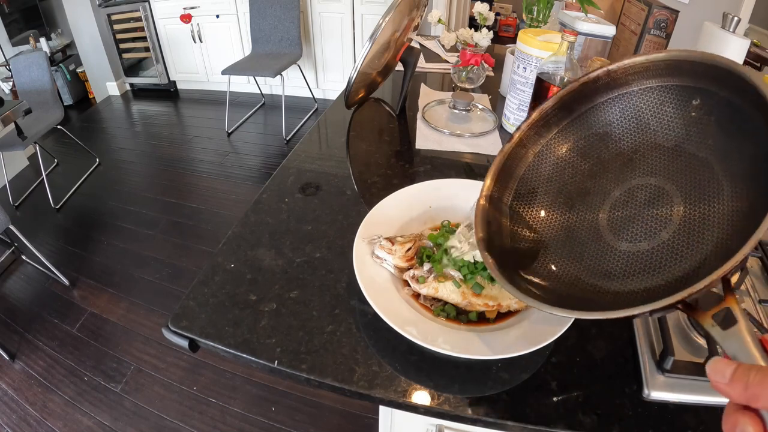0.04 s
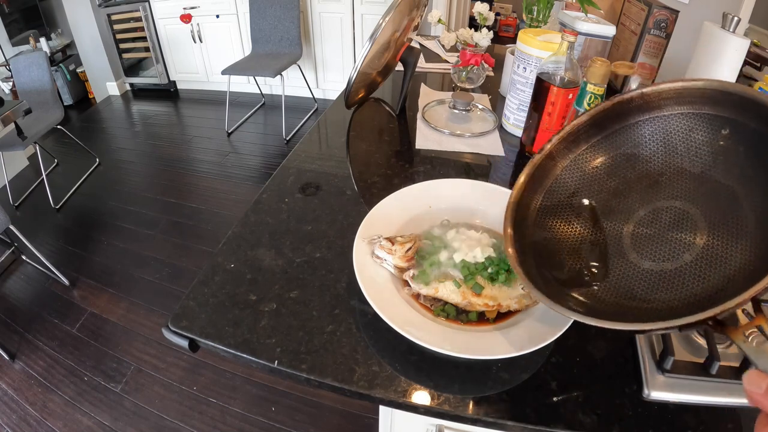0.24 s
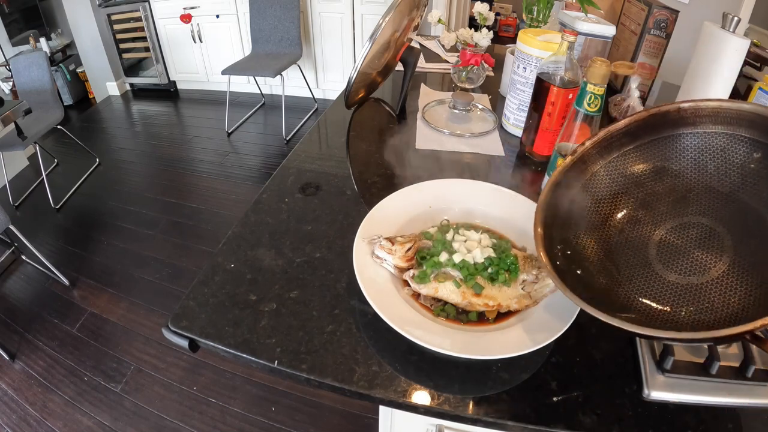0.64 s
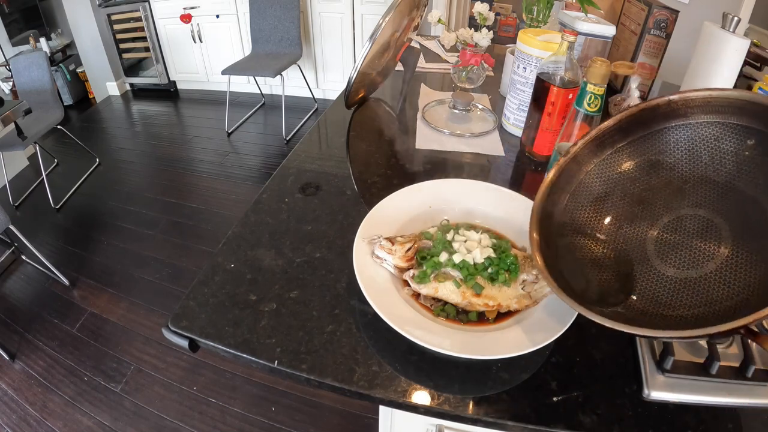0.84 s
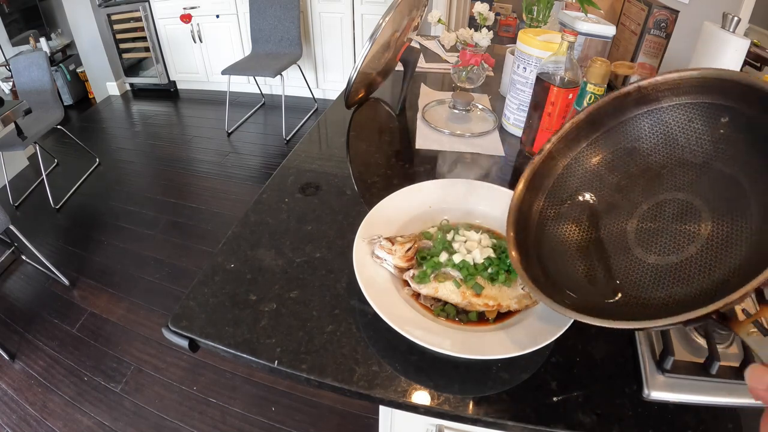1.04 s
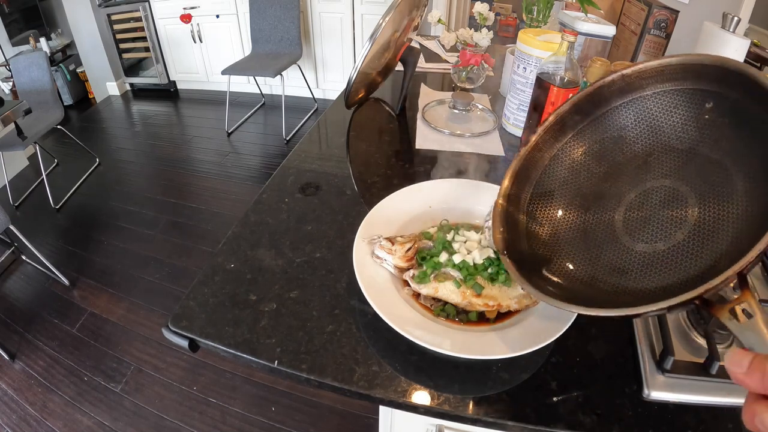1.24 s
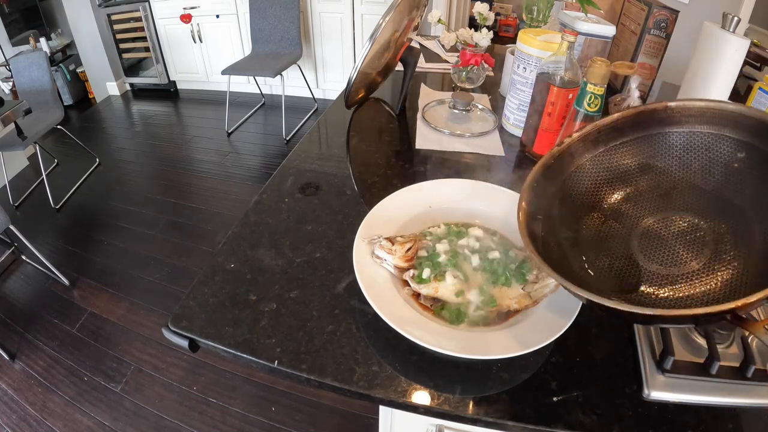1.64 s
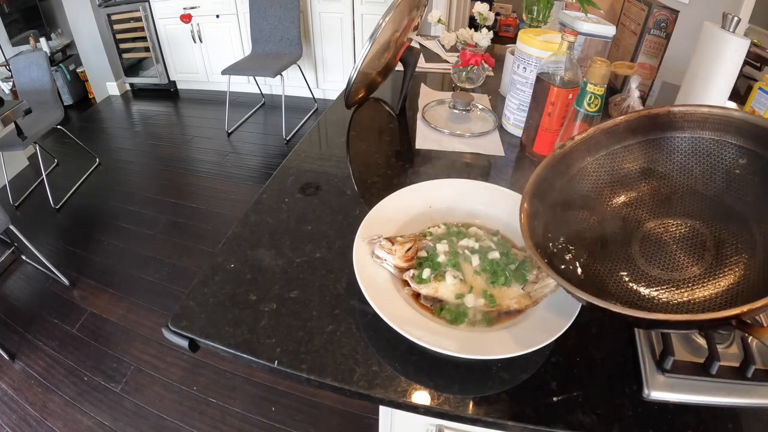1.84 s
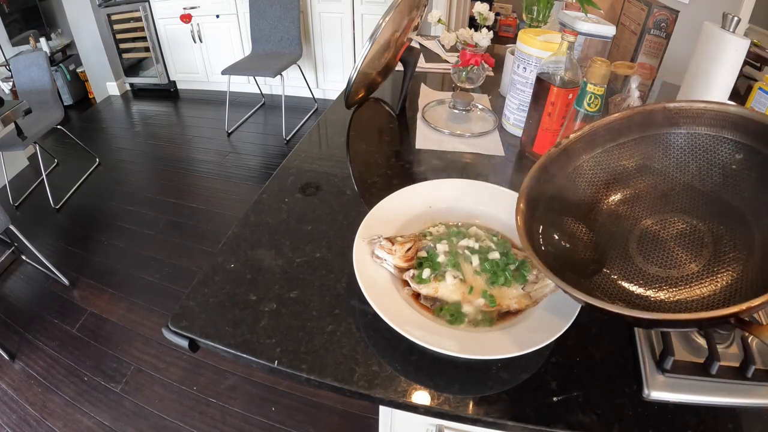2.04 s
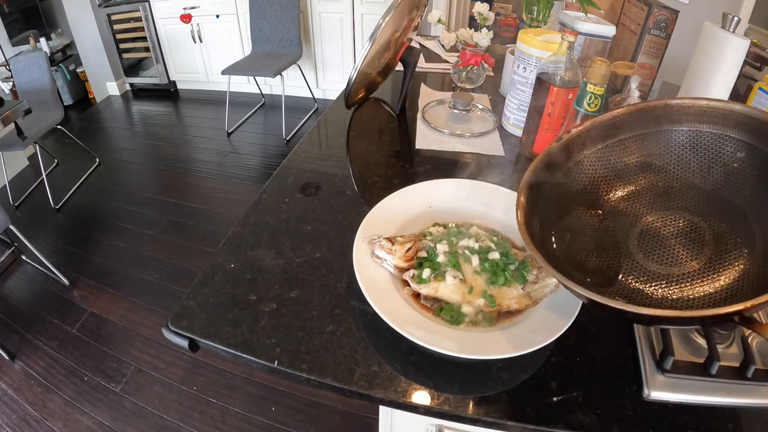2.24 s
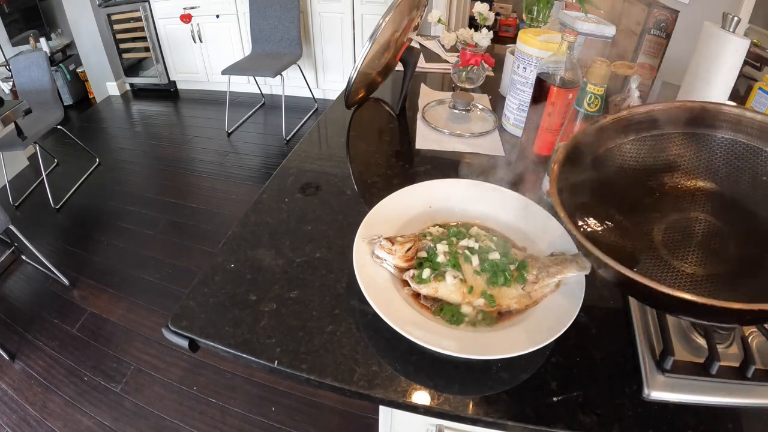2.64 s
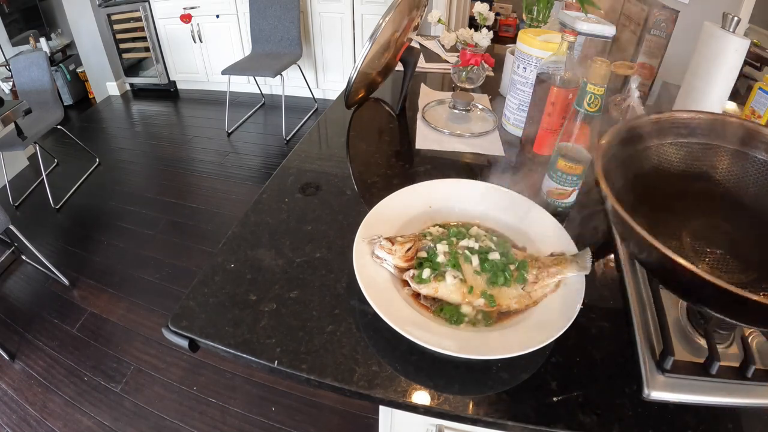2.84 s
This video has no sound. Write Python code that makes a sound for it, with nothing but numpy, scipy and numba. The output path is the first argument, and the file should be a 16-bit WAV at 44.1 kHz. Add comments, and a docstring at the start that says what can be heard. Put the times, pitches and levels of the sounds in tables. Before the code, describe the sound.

Hot oil sizzles loudly on fish and herbs just after the start, thinning to a fine fizz with sharp little pops. A steel pan clinks lightly around 0.8 seconds. At 1.4 seconds a second pour brings another dense sizzle, which fades more slowly and keeps crackling to the end. The pan clinks again from 2.5 to 2.7 seconds. The kitchen adds a short echo and a faint rumble.

```python
"""Hot oil sizzles as it is poured twice from a steel pan over a fish and herbs on a plate.
Each pour turns the moisture to steam in a dense boil of bursting bubbles, which thins to a
fine fizz and lone pops as the oil cools. The pan clinks lightly as it is tipped back after
each pour. The kitchen adds a short echo and a faint rumble."""
import sys
import numpy as np
from scipy import signal
from scipy.fft import rfft, irfft
from scipy.io import wavfile
from numba import njit

SR = 44100
rng = np.random.default_rng(int(sys.argv[2]) if len(sys.argv) > 2 else 0)


def digitize_waveform(pressure):
    """Quantize a signal to 16-bit integers and store it at the path in sys.argv[1].

    Rows of a 2-D input are taken as channels; values are limited to [-1, 1].
    """
    field = np.atleast_2d(pressure).T
    bounded = np.clip(field, -1, 1)
    quanta = np.round(bounded * 32767).astype(np.int16)
    wavfile.write(sys.argv[1], SR, quanta)


N = 132300

# Pours of oil: t/s, rise/s, hold/s, boil level/dB, boil fade/(dB/s), fizz level/dB,
# fizz fade/(dB/s), gurgle level/dB, sputter level/dB, first flash level/dB
POURS = [(0.137, 0.037, .115, -20, 45.5, -35, 19.5, -38.5, -39, -22.5),
         (1.397, 0.054, 0.15, -20, 24.5, -35.5, 6.5, -39, -34.5, -30.5)]
# Single spitting bubbles: t/s, level/dB, f/Hz, ring length/cycles
POPS = [(0.3793, -4.5, 3340, 3.1), (0.396, -20, 4400, 2), (0.444, -5, 2600, 1.6), (0.494, -2, 4830, 2.6),
        (0.5414, -13.5, 2150, 27), (0.543, -25, 890, 23), (0.5806, 0.5, 4020, 1.3),
        (0.6527, -12, 4020, 3.2), (0.6791, -9, 3680, 2.9), (.681, -40.5, 886, 33), (0.7497, -10, 4340, 3.6),
        (.9773, -8.5, 3700, 1.47), (.9989, -20, 5500, 3.5), (1.011, -48, 880, 28), (1.0408, -18, 2440, 2.9),
        (1.0795, -20, 2980, 2.2), (1.1126, -26, 5800, 8), (1.1158, -14.5, 5200, 7), (1.14, -5, 4160, 2.3),
        (1.2267, -24.5, 5600, 10), (1.3274, -20, 7200, 2.9), (1.768, -24.5, 232, 2.7),
        (1.837, 1, 4700, 2.2), (1.893, -20, 3500, 5), (1.9682, -10.5, 3340, 7.3),
        (2.0225, -11.5, 4650, 7.3), (2.0539, -10, 3200, 2), (2.072, 3, 4800, 1.6), (2.08, -4.5, 4200, 2.2),
        (2.0935, -1, 3980, 1.7), (2.121, -23.5, 937, 14), (2.129, -15, 3800, 5.8), (2.1505, -14.5, 2300, 6),
        (2.177, -7, 3820, 1.4), (2.1854, -8.5, 3850, 3.5), (2.2027, -9.5, 4900, 4.2),
        (2.2148, -3, 4830, 2.2), (2.2198, -14, 3770, 7), (2.2313, -1, 3650, 2.1), (2.2635, -8, 3500, 2.3),
        (2.3028, -20.5, 3630, 3.9), (2.319, -19, 2840, 5), (2.3478, -12, 3920, 13),
        (2.3509, -13, 2310, 3.3), (2.4335, -14, 4940, 4.5), (2.445, -41.5, 198, 5.1),
        (2.4508, -14, 4400, 3), (2.4606, -8.5, 4040, 3.4), (2.599, -3, 4000, 1.67),
        (2.6046, -9.5, 3700, 1.3), (2.6422, -15, 2250, 21), (2.718, -26, 1460, 8.2),
        (2.7825, -10.5, 4720, 3.3), (2.7861, -5.5, 4240, 1.32), (2.882, -17, 3170, 8.2),
        (2.8941, -12, 5340, 3.4), (2.9205, -17, 6200, 6)]
# Knocks on the pan: t/s, ring level/dB, brightest f/Hz, spread/octaves, ring time factor,
# scrape level/dB, scrape time to fade 60 dB/s
CLINKS = [(0.7059, -23.5, 4800, 0.18, 0.74, -21, .07), (0.7754, -23, 3050, 0.3, 0.98, -17.5, 0.036),
          (.778, -27, 5870, 0.13, 1, -18.5, 0.059), (0.8669, -32.5, 5970, 0.18, 0.86, -29.5, 0.059),
          (2.4986, -30, 4500, 0.2, 1, -21.5, .075), (2.518, -33, 4350, .13, 0.91, -28, 0.13),
          (2.6424, -27, 2740, 0.12, 0.74, -26, 0.12), (2.643, -23, 4840, 0.13, 1, -25.5, 0.12),
          (2.671, -31, 4350, 0.65, 0.88, -25.5, 0.12), (2.673, -42.5, 7900, 0.13, 0.68, -44, 0.063),
          (2.716, -50, 7000, .4, 0.97, -28, 0.19), (2.736, -41, 9500, 0.34, 0.78, -30, 0.077)]
# The pan's own ringing tones: f/Hz, level/dB, time to fade 60 dB/s
PAN_TONES = [(2648, -1, 0.39), (3047, -2, 0.24), (3640, -1.5, .28), (3790, -6, 0.42), (4250, -18, 0.33),
             (4368, -8.5, 0.25), (4464, -4, 0.43), (4700, -3, 0.18), (4360, -4.5, 0.4), (5370, -9, 0.38),
             (5340, -12, .2), (5730, -2, 0.09), (6130, -12.5, 0.45), (6880, -4, .17), (7140, -12, .2),
             (8080, 6, 0.13), (8970, 0, 0.25), (9550, 7, 0.2), (10700, -21, 0.19)]
# Tone curves of the rumble, the four bubble swarms and the pops: f/Hz, level/dB
RUMBLE_CURVE = [(20, -3.5), (55, -8), (100, -16), (128, -31), (155, -5.5), (190, -4), (245, -7.5),
                (450, -17.5), (1000, -21.5), (2500, -39), (15000, -50)]
BOIL_CURVE = [(100, -55), (300, -19), (520, -11.5), (620, -15), (760, -12), (860, -3), (960, -4),
              (1050, -2.5), (1200, -10), (1340, -6), (1520, -4), (1860, 2.5), (2300, -0.5), (2720, 1),
              (4500, -1.5), (7000, -6.5), (11000, -14), (15000, -7.5)]
FIZZ_CURVE = [(200, -47), (900, -8), (1300, -3), (2200, -5), (3300, -1), (4600, 0.5), (5500, -2),
              (7500, 0.5), (15000, -6)]
SPUTTER_CURVE = [(400, -42), (1500, -2), (2500, 3), (3600, 4.5), (4600, -10.5), (7000, -2), (15000, -17)]
GURGLE_CURVE = [(60, -33), (108, -20), (138, -1), (215, -0.5), (265, -7), (310, -2), (400, -5), (510, -4.5),
                (620, -3), (1200, -3.5), (4000, -58)]
POP_CURVE = [(60, -23), (105, -6), (160, 4), (3000, 4), (7000, 0), (15000, -4)]
# How well the pan passes each pitch to the air: f/Hz, level/dB
PAN_CURVE = [(150, -30), (700, -6), (2200, 0.5), (15000, -1.5)]
# How well the microphone picks up each pitch: f/Hz, level/dB
MICROPHONE_CURVE = [(100, -4), (6500, 0.5), (8100, 0), (9300, -12.5), (10800, 0.5), (12500, -4),
                    (14000, -14), (15800, -21)]


def gain(db):
    return 10 ** (np.asarray(db) / 20)


def unit(x):
    """Scale to an average (rms) level of 1."""
    return x / np.sqrt(np.mean(x ** 2))


def colour(x, curve, size=4096):
    """Filter a sound so that it follows a tone curve."""
    hz, db = np.array(curve, float).T
    grid_hz = np.arange(size // 2 + 1) * SR / size + 1
    cepstrum = irfft(np.log(gain(np.interp(np.log(grid_hz), np.log(np.sort(hz)), db))))
    # Fold the filter so that it never rings ahead of the sound.
    cepstrum[1:size // 2] *= 2
    cepstrum[size // 2 + 1:] = 0
    return signal.fftconvolve(x, irfft(np.exp(rfft(cepstrum)))[None], axes=1)[:, :N]


def room_rumble(level_db=-60.5, width=0.3):
    """The kitchen's faint, low background noise."""
    mid, side = rng.standard_normal((2, N))
    noise = np.array([mid + width * side, mid - width * side])
    return gain(level_db) * unit(colour(noise, RUMBLE_CURVE))


@njit
def bubble_rings(start, hz, cycles, size):
    """Each bubble rings as a short tone that fades by 60 dB over its number of cycles."""
    out = np.zeros(N)
    for k in range(len(start)):
        step = (2j * np.pi - np.log(1000) / cycles[k]) * hz[k] / SR  # turn and fade per sample
        first = int(start[k] * SR) + 1
        wave = size[k] * np.exp(step * (first - start[k] * SR)) / abs(step)
        turn, last = np.exp(step), 0.
        for i in range(max(first, 0), min(N, first + 3 + int(cycles[k] * SR / hz[k]))):
            out[i] += last - wave.imag  # the wave's slope starts with a snap
            last = wave.imag
            wave *= turn
    return out


def bursts(start, hz, cycles, size):
    """Bubbles burst all over the plate, so each reaches the two ears with its own lag and balance."""
    lag, balance = rng.standard_normal((len(start), 2)).T
    left_lag_s, left_db = 1.5e-5 + .4e-5 * lag, -0.1 * balance
    return np.array([bubble_rings(start + side * left_lag_s / 2, hz, cycles,
                                  size * gain(side * left_db / 2)) for side in (1, -1)])


def swarm(strength, curve, per_s, band_hz, cycles, scatter_db, thinning, spurt_db, count):
    """Many bubbles burst in spurts; as the strength drops they get quieter and further apart."""
    when, pitch, length, luck, big = rng.random((count, 5)).T
    spurts = np.interp(np.arange(N) / SR * 35, np.arange(400), rng.standard_normal(400))  # 35 a second
    now = (strength * gain(spurt_db * spurts))[(when * N).astype(int)]
    chance = np.minimum(per_s * N / SR / count * (now / strength.max()) ** thinning, 1)
    low, high = band_hz
    hz = low * (high / low) ** pitch
    ring_cycles = 1 - cycles * np.log(1 - length)
    boost = gain(scatter_db * np.minimum(-np.log(1 - big), 3.6))  # a few bubbles stand out
    size = now / np.sqrt(chance) * hz / np.sqrt(ring_cycles) * boost
    on = luck < chance
    bubbles = bursts(when[on] * N / SR, hz[on], ring_cycles[on], size[on])
    return unit(colour(bubbles, curve)) * np.sqrt(np.mean(strength ** 2))


def swell(start, rise, hold, db, fade):
    """Strength of one pour: it rises, holds, then fades as the oil cools."""
    age = np.arange(N) / SR - start
    return np.clip(age / rise, 0, 1) ** 2 * gain(db - fade * np.maximum(age - rise - hold, 0)) + 1e-9


def sizzle(flash_fade_db_per_s=71, gurgle_late_s=0.046, sputter_rise_s=0.22):
    """Water flashes to steam under the oil: a boil over a low gurgle, then sputter and lasting fizz."""
    boil = fizz = gurgle = sputter = 0
    for (start, rise, hold, boil_db, boil_fade, fizz_db, fizz_fade,
         gurgle_db, sputter_db, flash_db) in POURS:
        boil += swell(start, rise, hold, boil_db, boil_fade)
        fizz += swell(start, rise, hold, fizz_db, fizz_fade)
        fizz += swell(start, rise, 0, flash_db, flash_fade_db_per_s)
        # Large bubbles build later and die sooner; sputter takes over as the boil thins.
        gurgle += swell(start, rise + gurgle_late_s, hold, gurgle_db, boil_fade * 1.45)
        sputter += swell(start, sputter_rise_s, hold, sputter_db, boil_fade * 0.83)
    return (swarm(boil, BOIL_CURVE, per_s=11000, band_hz=(481, 13720), cycles=9,
                  scatter_db=3, thinning=.75, spurt_db=1.54, count=45000)
            + swarm(fizz, FIZZ_CURVE, per_s=10000, band_hz=(1093, 14900), cycles=17.5,
                    scatter_db=1, thinning=.25, spurt_db=2.5, count=30000)
            + swarm(sputter, SPUTTER_CURVE, per_s=810, band_hz=(1830, 5530), cycles=9.4,
                    scatter_db=5.5, thinning=.6, spurt_db=2, count=3000)
            + swarm(gurgle, GURGLE_CURVE, per_s=600, band_hz=(117, 860), cycles=7.5,
                    scatter_db=1, thinning=.84, spurt_db=1, count=4000))


def pops(collapse_db=-12):
    """Single larger bubbles snap and ring; a weaker snap follows as each one's skin collapses."""
    start, db, hz, cycles = np.array(POPS).T
    late, pitch = rng.random((len(POPS), 2)).T
    snap = bursts(start, hz, cycles, gain(db))
    delay_s = 0.000844 * (0.342 + late)
    collapse = bursts(start + delay_s, hz * (.7 + .6 * pitch), cycles + 3, gain(db + collapse_db))
    return colour(snap + collapse, POP_CURVE)


def pan_clinks(max_detune=0.012, twin_size=0.66, attack_s=0.00056):
    """Each knock scrapes and rings the steel; where it lands decides which tones sound and how long."""
    out = np.zeros((2, N))
    age = np.arange(SR // 2) / SR
    hz, db, fade_s = np.array(PAN_TONES).T[:, :, None]
    for start, ring_db, bright_hz, spread, sustain, scrape_db, scrape_s in CLINKS:
        def weight(f):
            """Pitches near the knock's brightest one sound most."""
            return np.exp(-.5 * (np.log2(f / bright_hz) / spread) ** 2) + .035 * np.minimum(f / 3000, 1)

        phase, twin_phase, split = rng.random((3, len(PAN_TONES), 1))
        twin_hz = hz * (1 + max_detune * (2 * split - 1))  # each tone has a slightly mistuned twin
        pair = np.sin(2 * np.pi * (hz * age + phase))
        pair += twin_size * np.sin(2 * np.pi * (twin_hz * age + twin_phase))
        levels = gain(ring_db + db - 60 * age / (fade_s * sustain)) * weight(hz)
        ring = np.minimum(age / attack_s, 1) * np.sum(levels * pair, axis=0)
        noise_spectrum = rfft(rng.standard_normal(len(age)))
        grit = unit(irfft(noise_spectrum * weight(np.linspace(1, SR / 2, len(noise_spectrum)))))
        scrape = grit * gain(scrape_db - 60 * age / scrape_s)
        first = int(start * SR)
        out[:, first:first + len(age)] += (ring + scrape)[:N - first]
    return colour(out, PAN_CURVE)


def below(x, hz):
    """Soften everything above this pitch."""
    return signal.sosfilt(signal.butter(1, hz, fs=SR, output="sos"), x)


def kitchen(x, echo_db, right_db, low_fade_s=0.52, treble_fade_s=0.18):
    """Add echoes from counter and walls, whose treble dies first, and lean the sound to the right."""
    age = np.arange(SR // 2) / SR
    mid, side = rng.standard_normal((2, len(age)))
    side -= below(side, 850)  # the bass is alike in both ears
    noise = np.array([mid + side, mid - side])
    low = below(noise, 2700)
    tail = low * gain(-60 * age / low_fade_s) + (noise - low) * gain(-60 * age / treble_fade_s)
    tail *= (1 + 3.9 * np.exp(-age / 0.0032)) * (age > .0005)  # the first echoes are strongest
    tail /= np.sqrt(np.sum(tail ** 2, axis=1, keepdims=True))
    echo = gain(echo_db) * signal.fftconvolve(x, tail, axes=1)[:, :N]
    return (x + echo) * gain([[-right_db / 2], [right_db / 2]])


def scene():
    """The sizzling food and the clinking pan, over the room's rumble."""
    food = kitchen(sizzle() + pops(), echo_db=-6.5, right_db=1)
    steel = kitchen(pan_clinks(), echo_db=-7.5, right_db=3)
    return food + steel + room_rumble()


def record(dry):
    """The microphone has a narrow dip in the treble, and the very top is cut off."""
    top_cut = signal.ellip(10, .2, 80, 15900, fs=SR, output="sos")
    return signal.sosfilt(top_cut, colour(dry, MICROPHONE_CURVE))


dry = scene()
out = record(dry)
digitize_waveform(out)
```